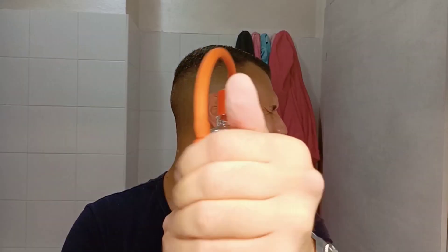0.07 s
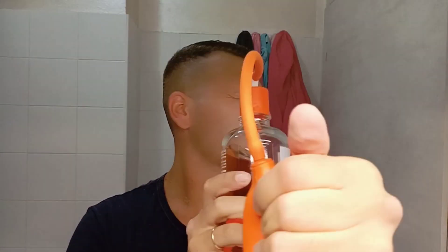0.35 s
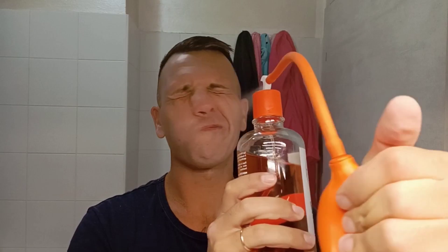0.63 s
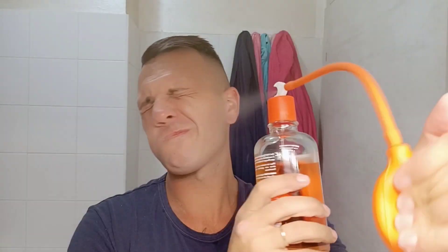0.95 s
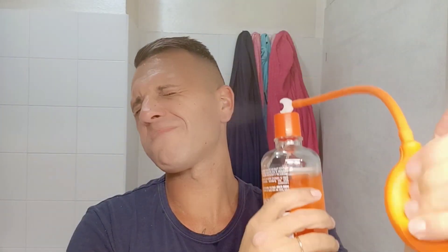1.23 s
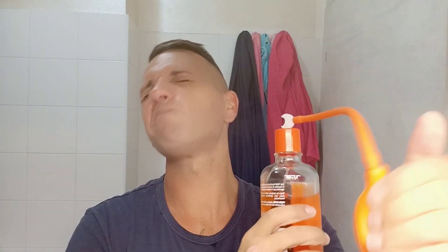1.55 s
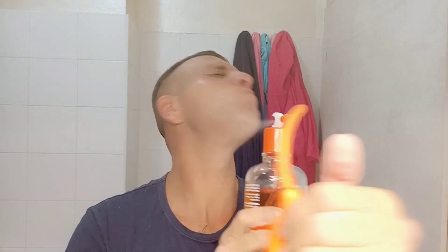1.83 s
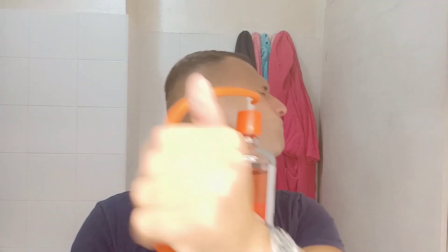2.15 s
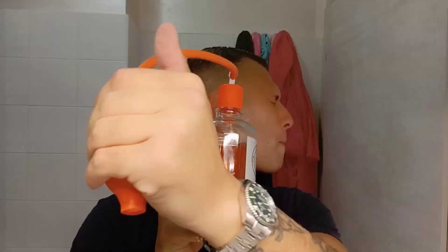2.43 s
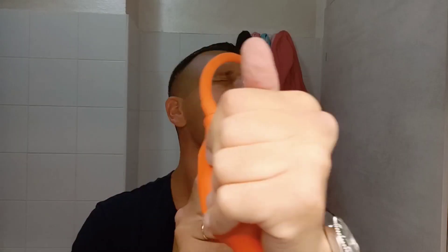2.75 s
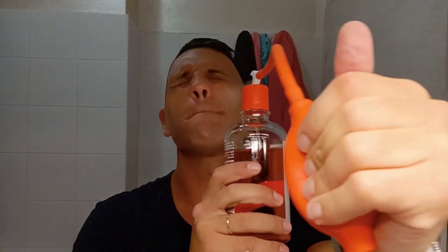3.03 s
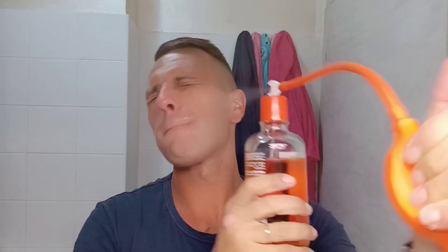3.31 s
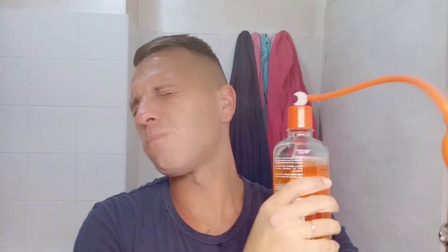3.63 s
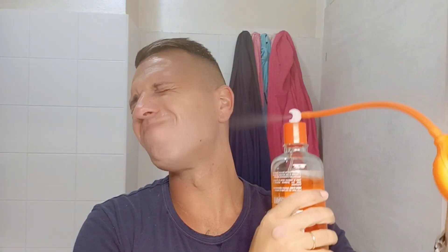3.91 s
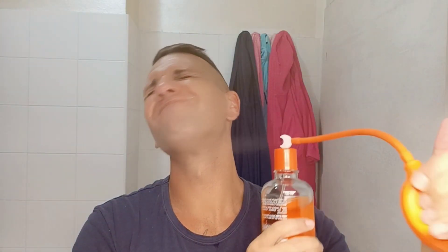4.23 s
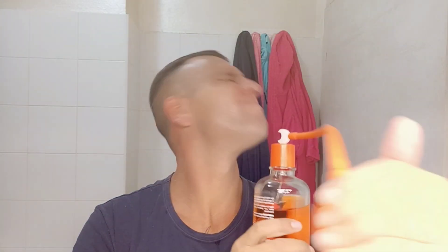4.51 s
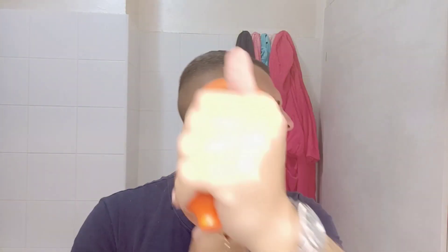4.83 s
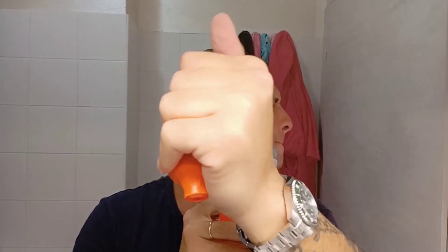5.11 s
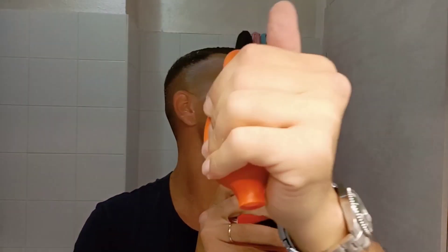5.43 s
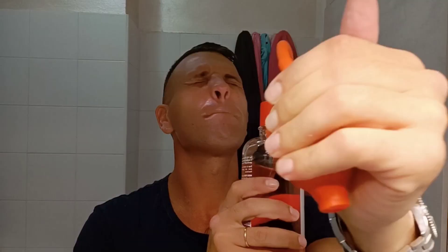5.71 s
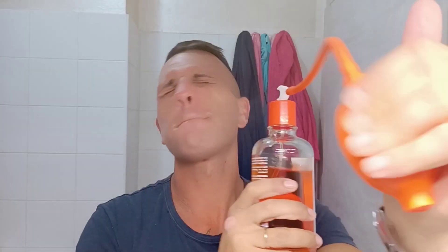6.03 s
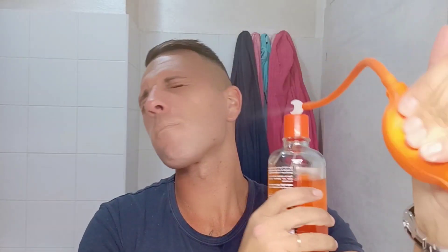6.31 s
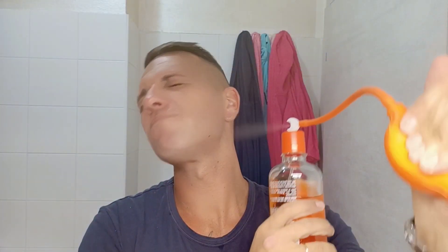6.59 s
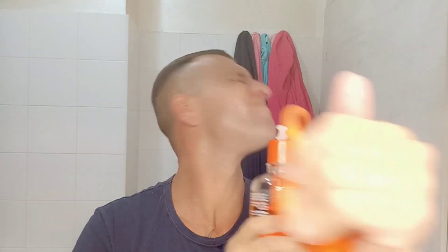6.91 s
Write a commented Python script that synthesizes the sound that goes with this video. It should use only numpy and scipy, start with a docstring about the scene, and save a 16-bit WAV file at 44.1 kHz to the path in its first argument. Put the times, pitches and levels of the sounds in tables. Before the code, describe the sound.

Rapid hissing puffs from a spray bottle's rubber bulb, about four a second, with dull valve clicks in a small tiled room.

```python
"""A bottle atomiser, its rubber bulb pumped by hand about four times a second, close to one
microphone in a small tiled bathroom. Each squeeze spits (harder after a longer pause), swells into a
hiss of mist, now and then whistles, and dies away while the bulb sucks air back in. The valves knock
twice a stroke and wake the room's standing waves. Early on the rubber creaks and a draught twice
bumps the microphone; faint room tone lies underneath."""
import sys
import numpy as np
from scipy import signal
from scipy.fft import rfft, irfft, next_fast_len
from scipy.io import wavfile
from scipy.ndimage import map_coordinates

SR = 44100
rng = np.random.default_rng(int(sys.argv[2]) if len(sys.argv) > 2 else 0)


def generate_wav(signal):
    """Clip the signal to [-1, 1] and save it as 16-bit WAV at the path in sys.argv[1]."""
    frames = np.transpose(np.atleast_2d(signal))
    scaled = np.clip(frames, -1, 1) * 32767
    pcm = np.round(scaled).astype(np.int16)
    wavfile.write(sys.argv[1], SR, pcm)


N = 315315
TIME = np.arange(N) / SR
STROKE = np.arange(SR // 2) / SR  # time within one stroke

# strokes of the bulb: (squeezed [s], let go [s], full again [s], effort [dB], brightness [dB])
STROKES = [(-.139, .001, .057, 0.5, 0), (0.099, .234, .309, .8, -1.5), (.356, .499, .565, .8, -2.8),
           (.611, .751, .811, .3, 2.5), (0.857, .993, 1.054, -.4, -.6), (1.099, 1.238, 1.289, .1, 1),
           (1.334, 1.466, 1.515, .6, 0), (1.561, 1.701, 1.745, .3, 1), (1.79, 1.935, 1.986, .7, -1.3),
           (2.028, 2.164, 2.206, .1, 0), (2.247, 2.385, 2.42, -.1, -0.5), (2.462, 2.602, 2.646, .2, -0.5),
           (2.69, 2.839, 2.884, -.2, -4), (2.928, 3.086, 3.125, 1.3, -1.3),
           (3.169, 3.318, 3.365, 1.5, -1.3), (3.407, 3.56, 3.596, 1, .1), (3.642, 3.788, 3.826, .9, .1),
           (3.867, 4.01, 4.05, .7, 1), (4.1, 4.241, 4.284, .1, -.8), (4.335, 4.481, 4.528, -.4, -2.2),
           (4.583, 4.716, 4.76, .1, -4), (4.809, 4.945, 4.991, -.8, -4), (5.045, 5.19, 5.255, 0, 0),
           (5.319, 5.459, 5.511, -1.2, -5), (5.565, 5.714, 5.766, -0.7, -4), (5.827, 5.967, 6.003, 0, -2),
           (6.057, 6.205, 6.242, .2, -2.3), (6.291, 6.432, 6.468, -.7, -1.5),
           (6.519, 6.686, 6.747, 1.2, -2.8), (6.802, 6.986, 7.051, .3, -1), (7.101, 7.249, 7.3, -0.5, -2.7)]
# hiss of the jet at the nozzle: (frequency [Hz], level [dB])
MIST_SPECTRUM = [(300, -43), (800, -18), (1200, -18), (1900, -8.5), (2450, -4), (2950, -1), (3250, -4),
                 (3850, 1), (4750, -4.5), (5650, 1), (6200, -4), (6700, -8), (7500, -14.5), (8100, -30)]
# hiss of air drawn into the bulb: (frequency [Hz], level [dB])
INTAKE_SPECTRUM = [(300, -28), (900, -13.5), (1500, -15), (2200, -5.5), (2700, -10), (3200, -12),
                   (4100, -5), (4750, -15.5), (5750, 2.5), (6700, -5), (7500, -8.5), (8100, -20.5)]
# intake hiss as the hand turns the inlet on and off microphone: (time [s], level [dB])
INTAKE_LEVELS = [(0, -43.5), (1.24, -45), (1.46, -49.5), (2.2, -46), (2.75, -47), (3.3, -49), (3.8, -58),
                 (4.7, -46), (6.2, -49.5), (6.65, -41.5), (7.05, -49)]
# puffs on which the nozzle whistles: (time [s], length [s], relative level [dB], pitch [Hz])
WHISTLES = [(0.612, .1, -53, 2930), (0.857, .18, -48.5, 3010), (1.099, .07, -48, 3050),
            (1.554, 0.14, -54, 2470), (3.642, .13, -50.5, 2850), (4.583, .13, -53, 2990)]
# rubbery modes of a valve: (frequency [Hz], level [dB], t60 [s])
VALVE_MODES = [(315, -1, .016), (485, 0, .015), (636, -1, .012), (928, -1.5, .014)]
# the knock that ends each refill: (time [s], level [dB])
SEATING_LEVELS = [(0, -32), (1.3, -35.5), (1.7, -38.5), (2.2, -39.5), (2.5, -36), (3.3, -38.5), (4.05, -38),
                  (4.3, -41.5), (5.3, -44), (6.2, -40.5), (7.1, -41)]
# rubber rubbing in the hand: (time [s], level [dB], centre [Hz])
CREAKS = [(.027, -54, 520), (0.261, -54, 600), (0.29, -54, 480), (1.024, -61, 550)]
# standing waves of the bathroom: (frequency [Hz], level [dB], t60 [s])
ROOM_MODES = [(98, -1, 0.69), (121, -1.5, 0.95), (192, 1.5, 0.72), (295.2, -1, .4), (485, -8, 0.29)]
# reverberation off the tiles: (frequency [Hz], t60 [s])
TILE_DECAY = [(150, 0.41), (1000, 0.35), (4000, 0.31), (8000, 0.19)]
# air on the microphone: (time [s], spread as standard deviation [s], peak level [dB])
DRAUGHTS = [(.535, .016, -36), (.77, .009, -36), (.798, .016, -44)]
# tone of the empty room: (frequency [Hz], level [dB])
ROOM_TONE_SPECTRUM = [(15, -34.5), (25, -3), (48, -13.5), (112, 2), (248, -14), (499, -4.5), (751, -24),
                      (2900, -9.5), (4820, -6), (5570, 1), (8000, -19.5), (10400, -45.5), (17600, -120)]

MIST_DB, SPIT_DB = -38.25 + 2, -49.7 + 1.54  # at usual effort, after the usual pause
USUAL_PAUSE_S, OPENING_DB, OPENING_DB_PER_S = .097, -3, 73  # a longer pause opens the jet harder
SPIT_HZ, SPIT_SCATTER_HZ, EDGE_TONE_HZ = 1560, 50, 2990
LET_GO_DB, THUD_DB = -41, -52 + 12.5  # the flap pushes the same air however hard it clicks
TOP_HZ = 8250


def atomiser():
    """Close up, each squeeze drives mist, spit and a faint edge tone; then the bulb breathes in."""
    track = np.zeros(N)
    last_let_go = STROKES[0][0] - USUAL_PAUSE_S
    for s, let_go, full, effort_db, bright_db in STROKES:
        rested_db = OPENING_DB_PER_S * (s - last_let_go - USUAL_PAUSE_S)
        length, last_let_go = let_go - s, let_go
        jet = mist(length, MIST_DB + effort_db, OPENING_DB + rested_db, bright_db)
        jet += spit(length, SPIT_DB + .5 * rested_db, SPIT_HZ + SPIT_SCATTER_HZ * rng.standard_normal())
        jet += edge_tone(length, effort_db - 61, EDGE_TONE_HZ)
        intake = refill(length, full - let_go, np.interp(let_go, *np.transpose(INTAKE_LEVELS)))
        add(track, s, bathroom(near_echoes(jet) + intake, wet_db=-2))
    return track


def mist(length, db, start_db, bright_db):
    """The jet opens at once, swells with the bulb's pressure and bleeds away after the release."""
    t = STROKE
    pressure_db = np.interp(t / length, [0, .1, .34, .66, .9, 1.25, 2],
                            [start_db, start_db + .5, 1, 0, -6.1 + 1.5, -17, -45])
    treble = lambda hz: 1 / (1 + (4700 / (hz + 1)) ** 6)
    body = noise(t, lambda hz: amp(along(MIST_SPECTRUM, hz)) * np.sqrt(1 - treble(hz)))
    fizz = noise(t, lambda hz: amp(along(MIST_SPECTRUM, hz)) * np.sqrt(treble(hz)))
    # more pressure tears finer drops: the treble grows faster than the body
    tilt_db = bright_db + .3 * (pressure_db + 6.5)
    body *= amp(-tilt_db / 2 + .7 * wobble(t, 60))
    fizz *= amp(tilt_db / 2 + .5 * wobble(t, 74))
    sputter = amp(.49 * wobble(t, 140) + 1.3 * wobble(t, 1100))  # liquid reaches the nozzle unevenly
    opening = 1 - np.exp(-t / .0013)
    return unit((body + fizz) * sputter) * amp(db + pressure_db) * opening


def spit(length, db, centre_hz):
    """Liquid gurgles in the nozzle, rising as it clears, and returns softly as the jet breaks off."""
    t = STROKE
    clearing = np.clip(t / .024, 0, 1) * np.pi / 2
    low = noise(t, lambda hz: resonance(hz, centre_hz - 90, 590))
    high = noise(t, lambda hz: resonance(hz, centre_hz + 60, 600))
    gurgle = (low * np.cos(clearing) + high * np.sin(clearing)) * np.exp(-(t / .027) ** 6)
    break_off = np.exp(-((t - .83 * length) / .025) ** 2)
    dribble = noise(t, lambda hz: resonance(hz, 1430, 1300)) * break_off
    return gurgle * amp(db) + dribble * amp(-52)


def edge_tone(length, db, hz):
    """A breathy tone of the nozzle, strongest as the jet opens."""
    centre_hz = hz * (1 + .0088 * rng.standard_normal())
    fade = np.exp(-(STROKE / (.4 * length)) ** 2.2)
    return noise(STROKE, lambda f: resonance(f, centre_hz, 300)) * amp(db + 5) * fade


def refill(length, fill_time, db):
    """The released bulb sucks air in through its inlet valve until it is round again."""
    filled = (STROKE - length) / fill_time
    flow_db = np.interp(filled, [-.02, .16, .36, 1.4], [-62, -.5, 3, -6.5])
    flow_db[filled > 1] = -62.5  # the hiss cuts off once the bulb is full
    return noise(STROKE, lambda hz: amp(along(INTAKE_SPECTRUM, hz))) * amp(db + flow_db - 3)


def whistles():
    """Now and then the nozzle's edge tone catches and stands out of the hiss."""
    track = np.zeros(N)
    for s, length, db, hz in WHISTLES:
        add(track, s, bathroom(edge_tone(length, db, hz), wet_db=-1))
    return track


def valves():
    """At let-go and at full, a flap clicks dully and its push of air wakes the room's standing waves."""
    track = np.zeros(N)
    releases = [(let_go, LET_GO_DB) for _, let_go, *_ in STROKES]
    seatings = [(full, np.interp(full, *np.transpose(SEATING_LEVELS))) for _, _, full, *_ in STROKES]
    swing = STROKE / .0016
    thud = amp(THUD_DB) * (1 - swing) * np.exp(-swing) * (1 - np.exp(-STROKE / .00065))
    contact = 1 - np.exp(-(STROKE / .0006) ** 2)  # rubber makes contact gradually
    for s, db in releases + seatings:
        click = amp(db) * contact * ring(VALVE_MODES, scatter_db=1.5, detune=.04)
        boom_db = db - .43 * (db + 52) - 19.5  # only partly follows the click
        boom = amp(boom_db) * ring(ROOM_MODES, scatter_db=2, detune=.008)
        landing = s + .00244  # the flap travels briefly before it seats
        add(track, landing, bathroom(click + thud, wet_db=-7.5))
        add(track, landing, boom)
    return track


def creaks():
    """Brief dull rubs of the bulb as it springs back."""
    track = np.zeros(N)
    for s, db, centre_hz in CREAKS:
        rub = noise(TIME, lambda hz: resonance(hz, centre_hz, 390))
        track += amp(db) * np.exp(-((TIME - s) / .0092) ** 2) * rub
    return track


def near_echoes(x, strength=.15, reach_s=.004, count=5):
    """Face, hand and wall close to the nozzle comb the hiss."""
    echoes = np.zeros(SR // 20)
    echoes[0] = 1
    delays = (rng.uniform(.1, 1, count) * reach_s * SR).astype(int)
    echoes[delays] += strength * rng.choice([-1, 1], count)
    return signal.fftconvolve(x, echoes / np.linalg.norm(echoes))[:len(x)]


def bathroom(x, wet_db):
    """The microphone hears the direct sound plus the tiles, anew for each place of the moving bottle."""
    hz, t, spectra = signal.stft(rng.standard_normal(len(STROKE)), SR, nperseg=256)
    decay = amp(-60 * t / along(TILE_DECAY, hz)[:, None])
    _, tail = signal.istft(spectra * decay, SR, nperseg=256)
    answer = amp(wet_db) * tail / np.linalg.norm(tail)
    answer[0] += 1  # direct path
    return signal.fftconvolve(x, answer) / np.linalg.norm(answer)


def draughts():
    """Short low bumps of moving air right on the microphone."""
    track = np.zeros(N)
    for s, width, db in DRAUGHTS:
        bump = np.exp(-((TIME - s) / width) ** 2 / 2) * noise(TIME, lambda hz: resonance(hz, 80, 130))
        track += amp(db) * bump / np.abs(bump).max()
    return track


def room_tone():
    """Faint rumble and hiss of the room, wavering slightly behind everything."""
    return noise(TIME, lambda hz: amp(along(ROOM_TONE_SPECTRUM, hz))) * amp(-55 + .86 * wobble(TIME, 7.1))


def amp(db):
    """Decibels to gain."""
    return 10 ** (np.asarray(db) / 20)


def unit(x):
    """Scale to rms 1."""
    return x / np.sqrt(np.mean(x ** 2) + 1e-20)


def along(points, hz):
    """A curve over frequency, read on a log axis."""
    frequencies, values = np.transpose(points)
    return np.interp(np.log(hz + 1), np.log(frequencies + 1), values)


def filtered(x, response):
    """Shape x by a gain that depends on frequency."""
    size = next_fast_len(len(x) + 8192)
    return irfft(rfft(x, size) * response(np.fft.rfftfreq(size, 1 / SR)), size)[:len(x)]


def noise(t, response):
    """Coloured noise of rms 1 over the times t."""
    return unit(filtered(rng.standard_normal(len(t)), response))


def resonance(hz, centre_hz, width_hz):
    """Gain of a resonance with steep skirts."""
    return 1 / (1 + (2 * (hz - centre_hz) / width_hz) ** 2)


def wobble(t, rate):
    """A smooth random curve, rate knots a second."""
    return map_coordinates(rng.standard_normal(int(t[-1] * rate) + 4), [t * rate])


def ring(modes, scatter_db, detune):
    """Damped modes, struck at slightly new strengths and pitches."""
    hz, db, t60 = np.transpose(modes)[:, :, None]
    level, pitch = rng.standard_normal((2, len(modes), 1))
    decay = amp(db + scatter_db * level - 60 * STROKE / t60)
    return np.sum(decay * np.sin(2 * np.pi * hz * (1 + detune * pitch) * STROKE), axis=0)


def add(track, s, sound):
    """Mix a sound into the track at time s."""
    start = round(s * SR)
    part = sound[max(-start, 0):max(N - start, 0)]
    track[max(start, 0):][:len(part)] += part


def scene():
    """One microphone near the bottle feeds both channels."""
    mono = atomiser() + whistles() + valves() + creaks() + draughts() + room_tone()
    return np.array([mono, mono])


def record(dry):
    """The recorder keeps nothing above its band limit."""
    return np.array([filtered(x, lambda hz: np.clip((TOP_HZ - hz) / 200, 0, 1)) for x in dry])


dry = scene()
out = record(dry)
generate_wav(out)
```